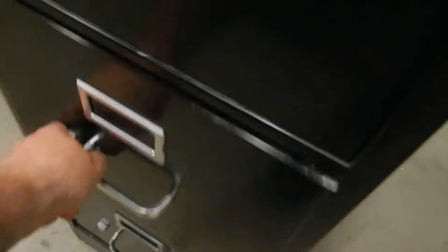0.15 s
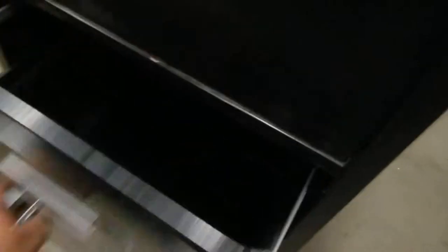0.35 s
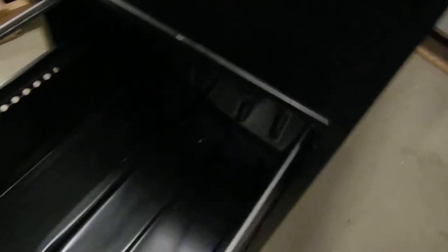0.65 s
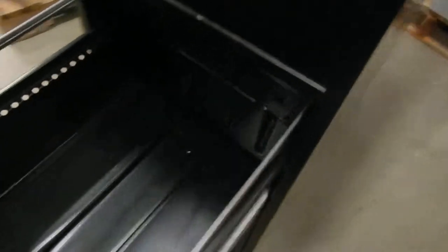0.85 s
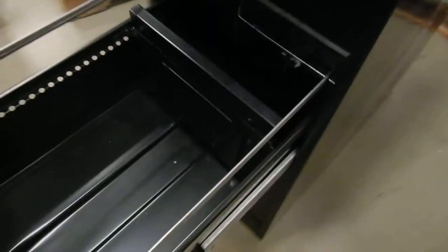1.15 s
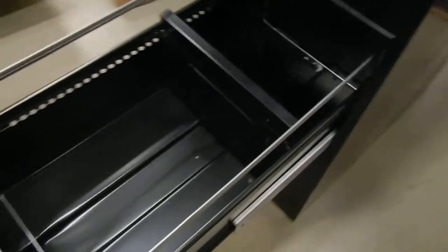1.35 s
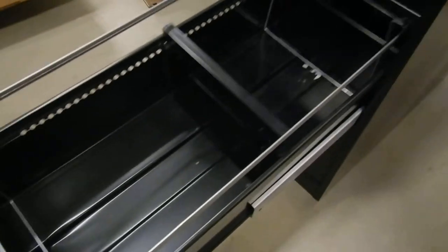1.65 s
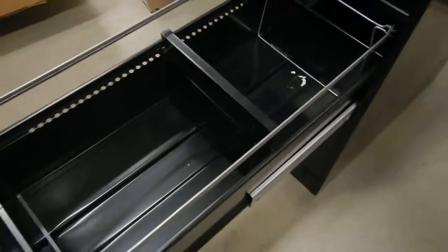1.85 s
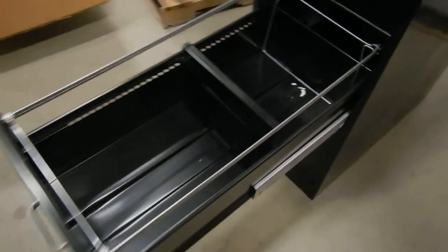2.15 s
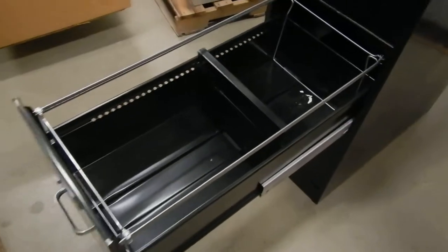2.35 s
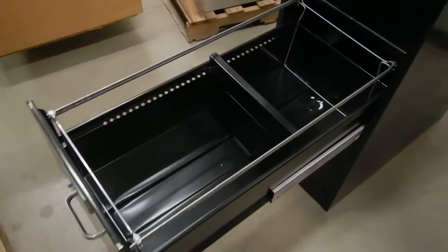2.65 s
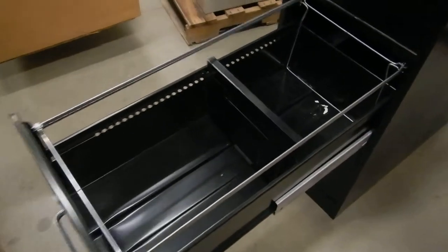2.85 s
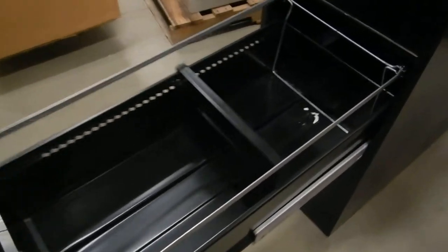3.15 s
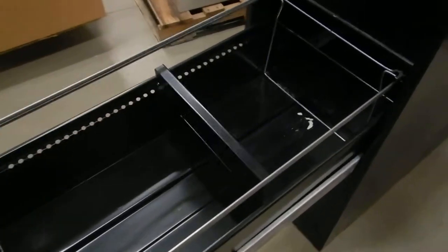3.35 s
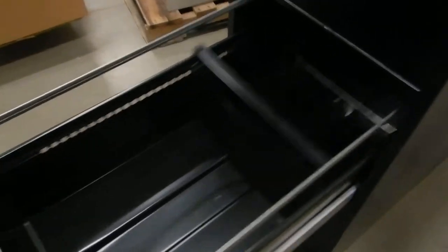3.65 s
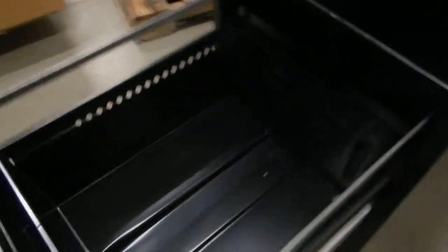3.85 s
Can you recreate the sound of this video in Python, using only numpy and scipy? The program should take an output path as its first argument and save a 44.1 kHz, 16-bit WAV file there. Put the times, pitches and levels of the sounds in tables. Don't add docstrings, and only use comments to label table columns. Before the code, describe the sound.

A steel filing drawer is yanked open close to a stereo microphone, clattering and rumbling on rollers, then slams into its stop; after a ringing pause it rolls back in, in a large hard-floored room.

```python
import sys
import numpy as np
from scipy import signal
from scipy.fft import rfft, irfft
from scipy.io import wavfile
from scipy.ndimage import uniform_filter1d

SR = 44100
rng = np.random.default_rng(int(sys.argv[2]) if len(sys.argv) > 2 else 0)


def boost(x):
    u = np.asarray(x, float) / 20
    return 10 ** u


def master_out(mix):
    frames = np.transpose(np.atleast_2d(mix))
    ceiling = np.clip(frames, -1, 1)
    pcm = np.round(ceiling * 32767).astype(np.int16)
    wavfile.write(sys.argv[1], SR, pcm)


N = 176400
T = np.arange(N) / SR


def evened(x):
    return x / np.sqrt(np.mean(x ** 2) + 1e-20)


def read(points, hz):
    f, v = np.transpose(points)
    return np.interp(np.log(hz + 1), np.log(f + 1), v)


def coloured(x, points, tilt_db=0, edge_db=-30):
    hz = np.abs(np.fft.fftfreq(8192, 1 / SR))
    octaves_below = np.maximum(np.log2((points[0][0] + 1) / (hz + 1)), 0)
    octaves_above = np.maximum(np.log2((hz + 1) / points[-1][0]), 0)
    tilt = tilt_db * np.log2((hz + 300) / 2500)
    level = read(points, hz) + edge_db * (octaves_below + octaves_above) + tilt
    log_gain = np.log(boost(np.maximum(level, -100)))
    response = np.fft.ifft(np.exp(signal.hilbert(log_gain).conj())).real[:4096]
    return signal.oaconvolve(x, response)[:len(x)]


def ringing(x, peaks, lift_db):
    out = 0
    for hz, width, db in peaks:
        r = np.exp(-np.pi * width / SR)
        poles = [1, -2 * r * np.cos(2 * np.pi * hz / SR), r * r]
        out = out + boost(db / 2) * signal.lfilter([1 - r, 0, r - 1], poles, x)
    return x + boost(lift_db) * out


def grains(per_s, spread_db, count=N):
    size = boost(spread_db * np.minimum(rng.exponential(1, count), 3.2))
    sign = rng.choice([-1., 1.], count)
    return size * sign * (rng.random(count) < per_s / SR)


def wander(samples, db, count=N):
    smooth = uniform_filter1d(rng.standard_normal(count), int(samples))
    return boost(db * evened(uniform_filter1d(smooth, int(samples))))


def modes(table, t):
    return sum(boost(db - 60 * t / t60) * np.sin(2 * np.pi * hz * t) for hz, db, t60 in table)


def add(mix, s, sound):
    part = mix[round(s * SR):][:len(sound)]
    part += sound[:len(part)]


def air():
    # (frequency [Hz], level [dB])
    vent_spectrum = [(30, -3), (125, -4), (320, -7.5), (450, -17.5), (1000, -21.5), (2000, -23),
                     (4800, -33.5), (7000, -56.5)]
    # (frequency [Hz], level [dB])
    harmonics = [(120, -61), (480, -67.5)]
    vent_db, duck_db = -48, -2.5
    recover_from_s, recover_db_per_s = 2.57, 7
    wash = evened(coloured(rng.standard_normal(N), vent_spectrum)) * wander(900, 0.66)
    hum = sum(boost(db + 5) * np.sin(2 * np.pi * hz * T) for hz, db in harmonics)
    gain_db = duck_db + recover_db_per_s * np.clip(T - recover_from_s, 0, .8)
    return (boost(vent_db) * wash + hum) * boost(gain_db)


def hall(x):
    # (frequency [Hz], t60 [s])
    reverb_times = [(80, 2.3), (250, 1.25), (1000, 0.82), (3000, 0.73), (6000, 0.68), (12000, 0.45)]
    delay_s = 0.007
    hz, t, z = signal.stft(rng.standard_normal((3, 60000)), SR, nperseg=512)
    decay = boost(-60 * t / read(reverb_times, hz)[:, None])
    tails = signal.istft(z * decay, SR, nperseg=512)[1]
    tails = tails * np.clip(np.arange(tails.shape[1]) / SR / delay_s - .5, 0, 1)
    turns = 5 * T + np.arange(3)[:, None] / 3
    feed = x * np.sqrt(2 / 3) * np.cos(2 * np.pi * turns)
    wet = signal.fftconvolve(feed, tails / np.linalg.norm(tails[0]), axes=1).sum(0)[:N]
    return coloured(wet, [(20, -6), (250, -2.0), (1000, 1.5), (4000, -4.0), (15000, -12.0)])


def motion(order):
    # (time [s], rumble level [dB], grit level [dB], sizzle
    # level [dB])
    opening = [
        (0.0, -28.5, -30, -35),
        (0.35, -24, -31.5, -49),
        (0.53, -28, -28, -36.5),
               (0.56, -37, -42.5, -55), (0.63, -35.5, -34, -54), (0.68, -29, -37, -43.5),
            (0.8, -32, -36.5, -52), (0.94, -30, -35, -46.5), (1.09, -26.5, -35, -44),
            (1.25, -31.5, -38, -48), (1.34, -28, -37.5, -45), (1.419, -34, -38.5, -49),
            (1.499, -29, -40, -60), (1.81, -36.5, -37, -48.5)]
    # (time [s], rumble level [dB], grit level [dB], sizzle level [dB])
    push = [
        (3.28, -44, -54.5, -70.5),
        (3.57, -35, -40.5, -59),
        (3.792, -24, -32, -44.5),
        (4.0, -27.5, -35, -47),
    ]
    stop_s = 1.825
    rows = np.array(opening + push)
    moving = (T < stop_s) | (T > push[0][0])
    return uniform_filter1d(boost(np.interp(T, rows[:, 0], rows[:, order])) * moving, 300)


def patches(train, t60, count=10):
    where, t = rng.integers(0, count, N), T[:3000]
    out = 0
    for k in range(count):
        response = rng.standard_normal(3000) * boost(-60 * t / t60)
        out = out + signal.oaconvolve(train * (where == k) * wander(1550, 3.5), response)[:N]
    return out


def rollers():
    # (frequency [Hz], level [dB])
    wall_spectrum = [(30, -30.5), (80, -4.5), (130, -3), (180, -3.5), (225, -1.5), (320, -1), (370, -9.5),
                     (520, -20)]
    # (frequency [Hz], bandwidth [Hz], level [dB])
    panels = [(167.8, 165, -10)]
    # (frequency [Hz], level [dB])
    grit_spectrum = [(420, -12.5), (640, 2), (900, 0), (1550, -0.5), (1800, -5), (2600, -6.5), (3500, -19),
                     (5000, -37.5)]
    # (frequency [Hz], bandwidth [Hz], level [dB])
    rails = [(632, 42, -3.5), (1566, 95, -12.5), (4340, 228, -12), (4715, 190, -9)]
    # (frequency [Hz], level [dB])
    sizzle_spectrum = [(2500, -11.5), (3500, -3.5), (5000, 1), (5600, -10), (8000, -20.5), (9800, -42),
                       (12000, -31), (14500, -50.5)]
    bumps_per_s, bump_spread_db = 400, 3.5
    ticks_per_s, tick_spread_db = 3000, 2
    sway_hz, sway_db, sway_start_s, sway_end_s = 85, -27, 0.047, 0.48

    bumps = grains(bumps_per_s, bump_spread_db) + 0.23 * rng.standard_normal(N)
    rumble = evened(ringing(coloured(bumps, wall_spectrum), panels, -0.68))

    sway_spectrum = [(40, -8), (sway_hz, 0), (190, -5), (400, -22), (520, -13)]
    sway = evened(coloured(rng.standard_normal(N), sway_spectrum))
    rocking = uniform_filter1d(1. * (T > sway_start_s) * (T < sway_end_s), 2000)
    sway = boost(sway_db) * sway * rocking

    lumps = wander(400, 1.6)
    ticks = patches(grains(ticks_per_s, tick_spread_db) * lumps, 0.064)
    grit = evened(ringing(coloured(ticks, grit_spectrum), rails, -2.2))
    sizzle = evened(coloured(ticks * wander(1500, 1.4), sizzle_spectrum))

    out = sway + boost(-0.5) * motion(order=1) * rumble
    out = out + boost(1.5) * motion(order=2) * grit
    return out + boost(2.7) * motion(order=3) * sizzle


def scrape(length, db, pitch):
    # (frequency [Hz], level [dB])
    rail_spectrum = [(1060, -37), (1800, -15), (2700, -10.5), (3400, -3.5), (4760, -3.5), (5810, -7.5),
                     (11100, -25.5), (13300, -29), (15000, -59.5)]
    # (frequency [Hz], bandwidth [Hz], level [dB])
    rail_peaks = [(4150, 38, 2.5), (4630, 66, 1.5), (5340, 42, -6)]
    t = np.arange(0, length, 1 / SR)
    slips = grains(6000, 1.5, count=len(t)) * wander(120, 2.1, count=len(t))
    swell = np.sin(np.pi * (t / length) ** .8) ** .7
    colour = [(hz * pitch, level) for hz, level in rail_spectrum]
    peaks = [(hz * pitch, width, level) for hz, width, level in rail_peaks]
    return boost(db) * swell * evened(ringing(coloured(slips, colour), peaks, 1.7))


def bracket_clang(mode):
    t = T[:4000]
    return modes([mode], t) * np.minimum(t / 0.0011, 1)


def thump(db):
    # (frequency [Hz], level [dB], t60 [s])
    box_modes = [(149.5, -5, 0.17), (192, 0, 0.033), (241, 7, 0.029), (286, -2.5, 0.15),
                 (324.4, -9.5, 0.11)]
    t = T[:12000]
    pushed = modes(box_modes, t) * (1 - np.exp(-t / 0.00121))
    ring = signal.lfilter(*signal.butter(2, 120, 'high', fs=SR), pushed)
    return boost(db) * ring / abs(ring).max()


def knock(db, bright_db, rattle_s, thump_db):
    # (frequency [Hz], level [dB])
    sheet_spectrum = [(250, -24), (420, -4.5), (1070, -2), (2460, 1), (3270, -1.5), (4430, -3), (6660, -12),
                      (10000, -34), (13500, -41.5), (15500, -59.5)]
    # (frequency [Hz], level [dB], t60 [s])
    rail_modes = [(1172, -9.5, 0.088), (1508, -4, 0.37), (2380, -8, 0.1), (4010, -0.5, 0.19),
                  (4525, 3.5, 0.23), (6680, -8.5, 0.14), (6568, -5, 0.46)]
    steel_db, steel_damping, chatter_gain = -15, .45, .25
    sheet_t60_s, crack_db, crack_s, trim_db = 0.12, 2, 0.0027, -8.5
    t = T[:12000]
    rattle = grains(460, 2.4, count=len(t)) ** 2 * np.exp(-2 * t / max(rattle_s, .001))
    blows = chatter_gain * rattle + (t == 0)
    decay = boost(-60 * t / sheet_t60_s) + boost(crack_db) * np.exp(-t / crack_s)
    power = abs(signal.fftconvolve(blows, decay ** 2)[:len(t)])
    sheet = rng.standard_normal(len(t)) * np.sqrt(power)
    struck = [(hz * rng.uniform(0.96, 1.04), level + rng.uniform(-9.0, 3), steel_damping * t60)
              for hz, level, t60 in rail_modes]
    metal = evened(sheet) + boost(steel_db) * evened(modes(struck, t))
    clang = coloured(metal * np.minimum(t / 0.00048, 1), sheet_spectrum, bright_db)
    top = np.sqrt(uniform_filter1d(clang ** 2, 200).max())
    return boost(db + trim_db) * clang / top + thump(db + thump_db)


def scene():
    # (time [s], peak level [dB], brightness [dB/octave], rattle [s], thump level [dB])
    knocks = [(0.015, -20, 7.5, 0.0048, -16), (0.023, -16.5, 4, 0.0047, -17.5),
              (0.029, -21.5, -6, 0.0057, -15), (0.08, -8.5, 1.5, 0.018, -1.5), (0.138, -14, 4, 0.012, -7),
              (0.384, -36.5, -6.5, 0.0088, -14), (0.4589, -17, -6.5, 0.028, -10),
              (0.516, -2.5, 1.5, 0.016, -20), (0.643, -23.5, 3, 0.021, -16),
              (0.9278, -23.5, -3.5, 0.04, -11.5), (1.053, -16.5, -5.5, 0.051, -14.5),
              (1.436, -22, 7, 0.0045, -1.5), (1.809, -17.5, 0.5, 0.016, -3), (1.823, -3, 0, 0.025, -15.5),
              (1.848, -7.5, 3.5, 0.031, -19.5), (2.031, -26, -1.5, 0.0044, -10),
              (3.301, -35, -5.5, 0.025, -8.5), (3.378, -31, -9.5, 0.027, -0.5),
              (3.5022, -31.5, -10, 0.017, -7.5), (3.582, -40, -3, 0.008, -15),
              (3.5949, -31.5, -4.5, 0.008, -4), (3.606, -30.5, -8, 0.02, -7),
              (3.671, -24.5, -4, 0.028, -23), (3.72, -20.5, -5, 0.036, 4), (3.8017, -23, -3.5, 0.02, -7.5),
              (3.959, -19, -4.5, 0.035, -6)]
    # (time [s], peak level [dB])
    thumps = [
        (0.089, -23.5),
        (1.438, -16.5),
        (1.828, -5),
        (3.342, -24),
        (3.91, -15),
    ]
    # (time [s], frequency [Hz], level
    # [dB], t60 [s])
    clangs = [(0.001, 724, -14, 0.044), (0.0785, 2745, -7, 0.01), (0.0787, 4940, -9, 0.011),
              (0.085, 1432, -14.5, .03), (0.5165, 2914, -9.5, 0.028), (0.517, 1130, -12.5, .03),
              (0.529, 4360, -11, 0.017), (1.833, 2210, -11.5, .04), (1.847, 4540, -12.5, .03),
              (1.852, 2910, -15.5, 0.0284), (1.864, 4680, -16, .03), (3.6, 2256, -31.5, 0.054),
              (3.605, 3686, -42, 0.28), (3.734, 4490, -29.5, 0.068), (3.8, 1580, -23.5, .06),
              (3.911, 1508, -30, 0.098), (3.96, 4650, -34, 0.047), (1.052, 1538, -21, 0.056),
              (1.8225, 1680, -3, 0.026), (3.378, 1561, -37, 0.089), (3.495, 2840, -45.5, .2),
              (3.52, 4050, -46, 0.039), (3.645, 2380, -34.5, .15), (1.826, 2710, -6, 0.023),
              (1.827, 264, -4.5, 0.043), (1.885, 257.3, -23.5, 0.33), (3.3, 1543, -43, 0.072),
              (3.672, 2350, -26, .06), (3.72, 1573, -21.5, .05)]
    # (start [s], length [s], level [dB], pitch factor [1])
    scrapes = [
        (0.491, 0.035, -29.5, 0.69),
        (1.048, 0.093, -43, 0.89),
        (1.3, 0.068, -42, 1),
        (1.444, 0.1, -25.5, 0.95),
        (3.267, 0.057, -59.5, 1),
        (3.58, 0.19, -36.5, 0.5),
        (3.712, .06, -39, 0.72),
        (3.774, .1, -42, 0.89),
    ]
    hall_db = -9.5
    bracket_send_db = -10
    drawer, bracket = rollers(), np.zeros(N)
    for s, *row in scrapes:
        add(drawer, s, scrape(*row))
    for s, *mode in clangs:
        add(bracket, s, bracket_clang(mode))
    for s, db in thumps:
        add(drawer, s, thump(db))
    for s, *row in knocks:
        add(drawer, s, knock(*row))
    reverb = hall(drawer + boost(bracket_send_db) * bracket)
    mid = drawer + bracket + boost(hall_db) * reverb + air()
    return np.array([mid, mid])


def low_pass(x):
    return signal.sosfilt(signal.butter(12, 15750, fs=SR, output="sos"), x)


def record(dry):
    # (frequency [Hz], level [dB])
    port_difference = [(40, -24.5), (110, -24.5), (200, -31), (380, -24), (1290, -19.5), (2380, -14),
                       (4400, -7), (8120, -3.5), (15000, 3.5)]
    mic_low_hz, lag_share, ceiling = 41.5, 0.45, .95
    mid = signal.lfilter(*signal.butter(2, mic_low_hz, 'high', fs=SR), dry.mean(0))
    z = signal.stft(mid, nperseg=256)[2]
    random_phase = np.exp(2j * np.pi * rng.random(z.shape))
    scatter = evened(signal.istft(z * random_phase, nperseg=256)[1][:N]) * mid.std()
    lag = signal.hilbert(mid).imag
    other = lag_share * lag + np.sqrt(1 - lag_share ** 2) * scatter
    side = irfft(rfft(other) * boost(read(port_difference, np.fft.rfftfreq(N, 1 / SR))), N)
    stereo = np.array([mid + side, mid - side])
    return low_pass(ceiling * np.tanh(stereo / ceiling))


dry = scene()
out = record(dry)
master_out(out)
```